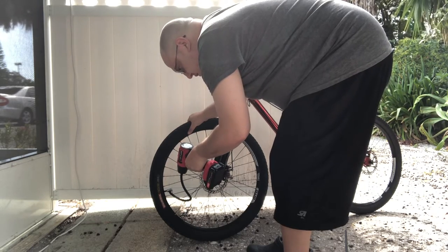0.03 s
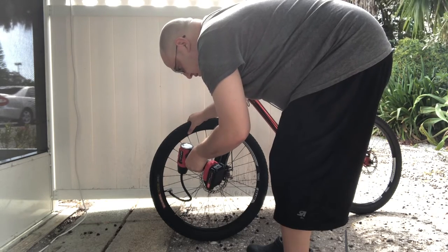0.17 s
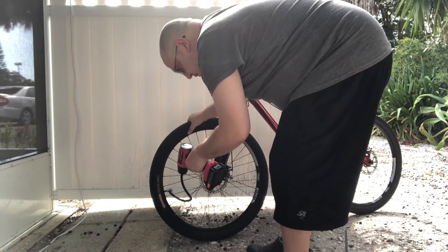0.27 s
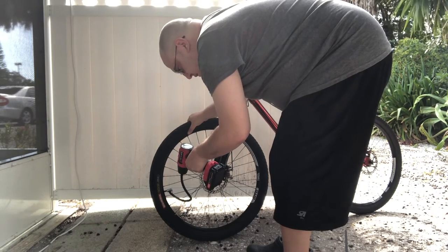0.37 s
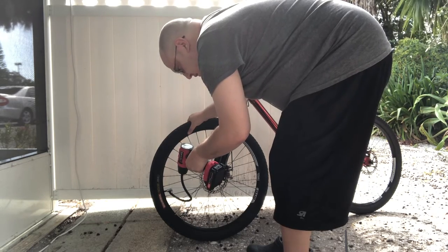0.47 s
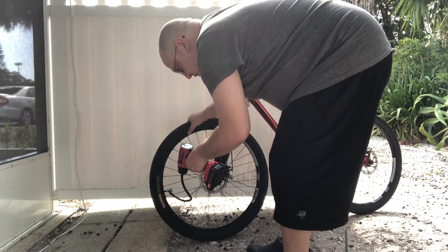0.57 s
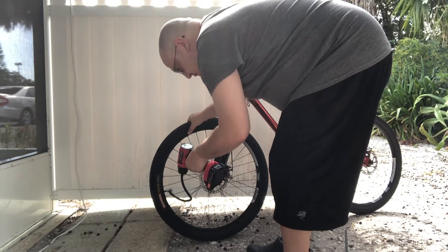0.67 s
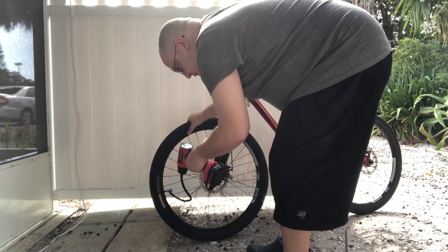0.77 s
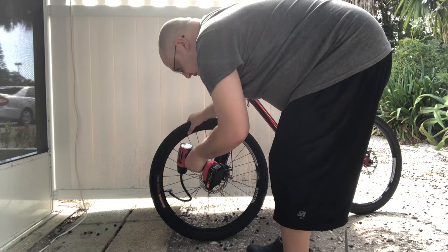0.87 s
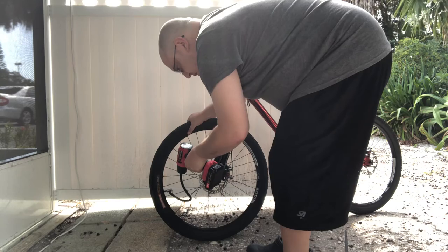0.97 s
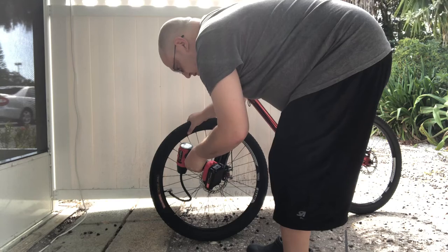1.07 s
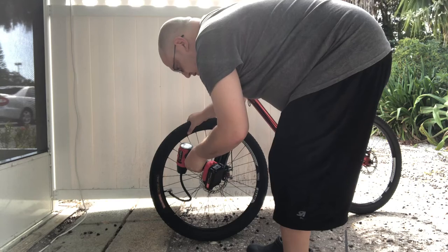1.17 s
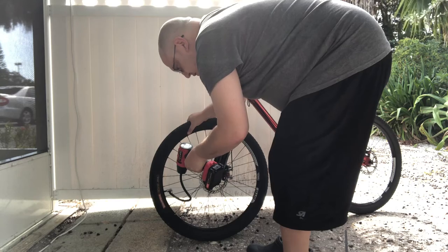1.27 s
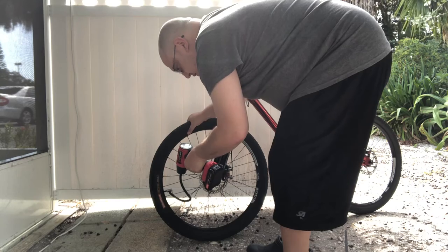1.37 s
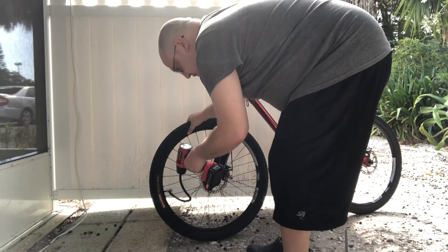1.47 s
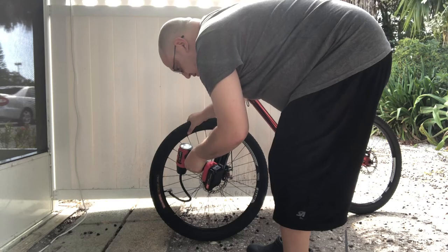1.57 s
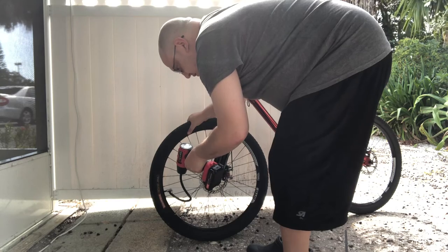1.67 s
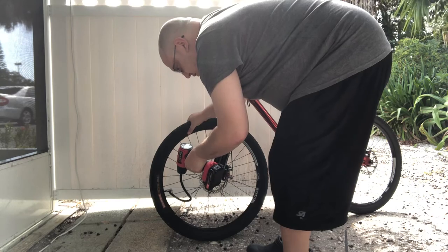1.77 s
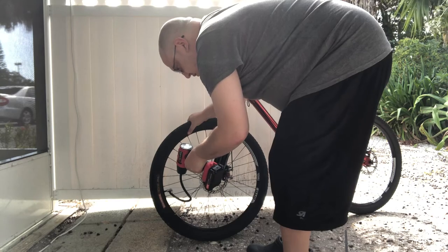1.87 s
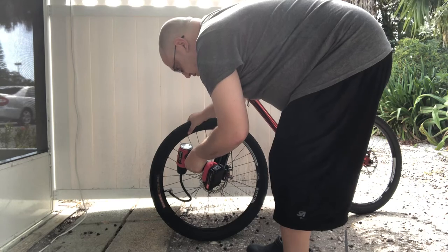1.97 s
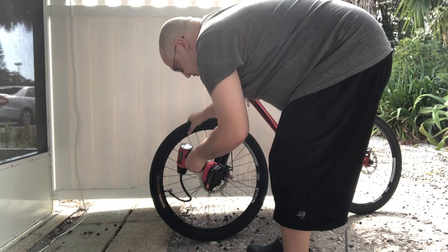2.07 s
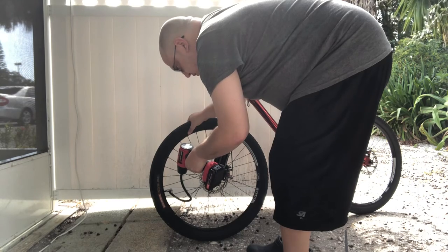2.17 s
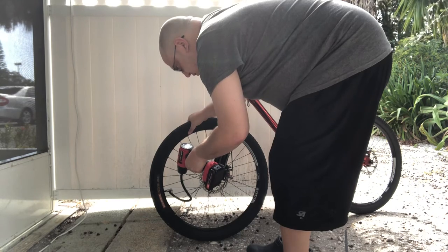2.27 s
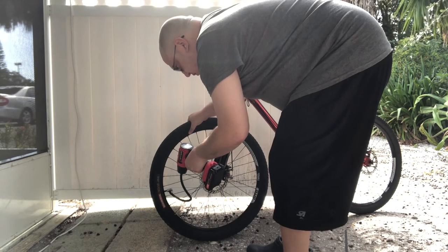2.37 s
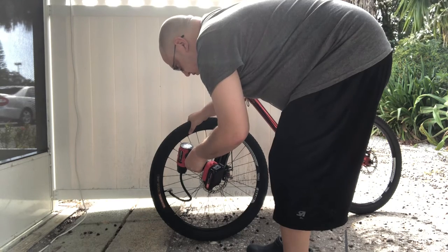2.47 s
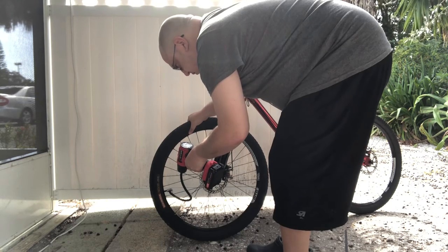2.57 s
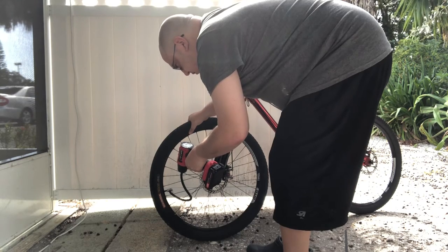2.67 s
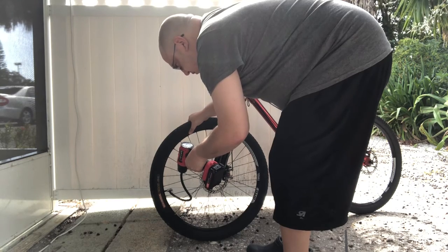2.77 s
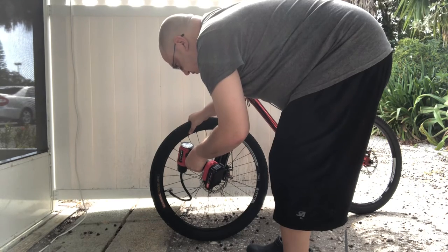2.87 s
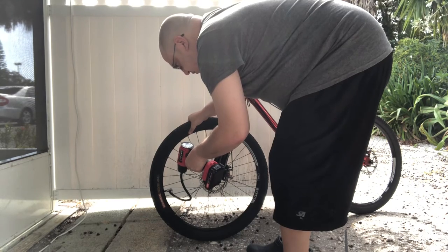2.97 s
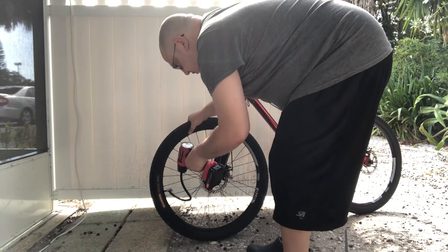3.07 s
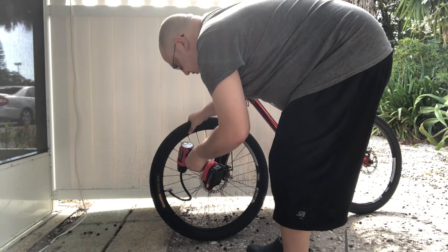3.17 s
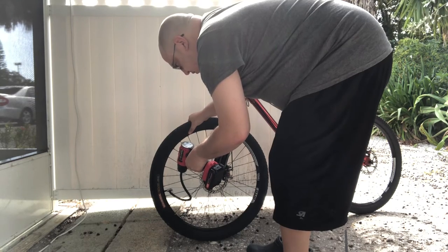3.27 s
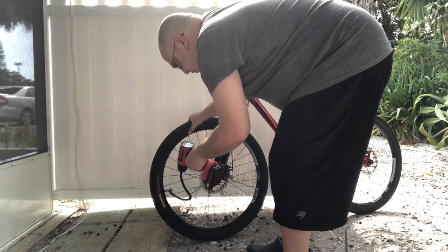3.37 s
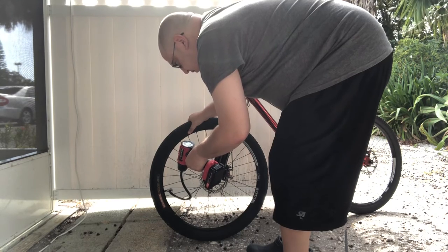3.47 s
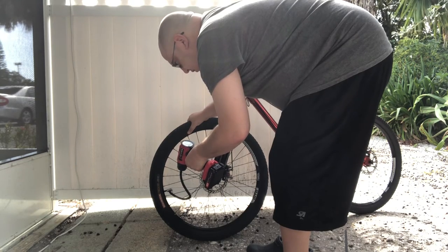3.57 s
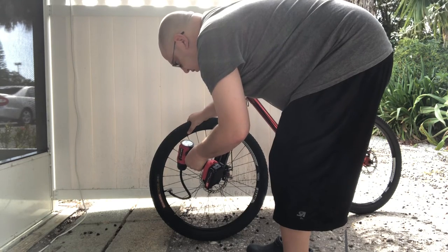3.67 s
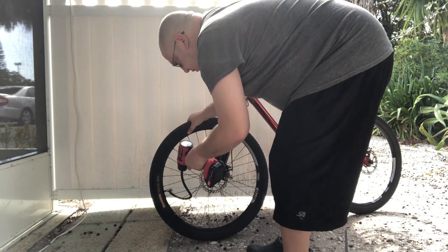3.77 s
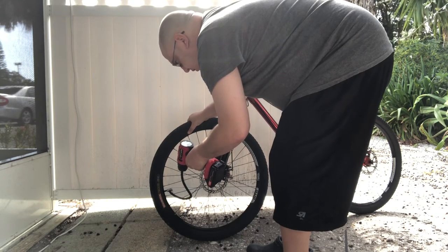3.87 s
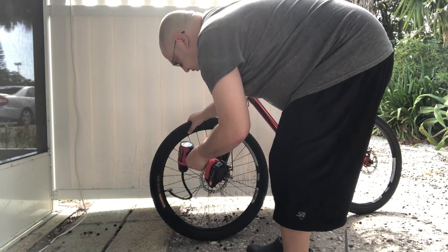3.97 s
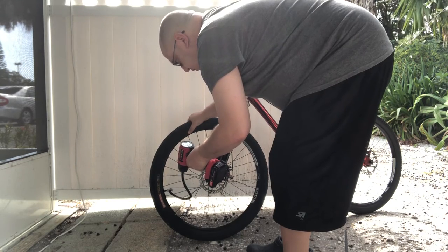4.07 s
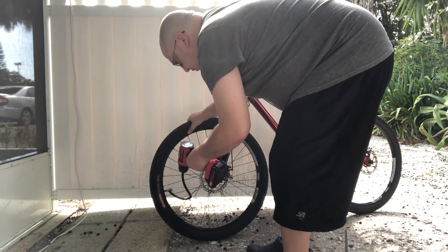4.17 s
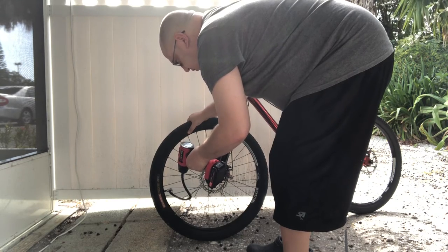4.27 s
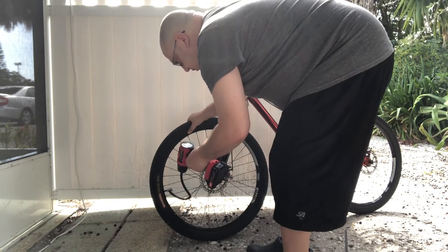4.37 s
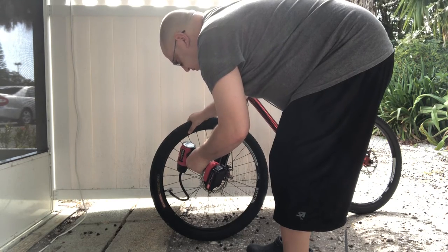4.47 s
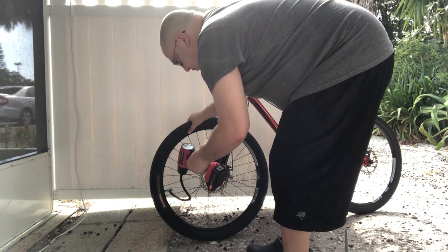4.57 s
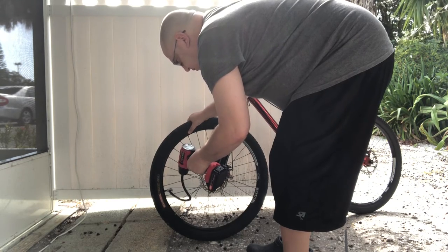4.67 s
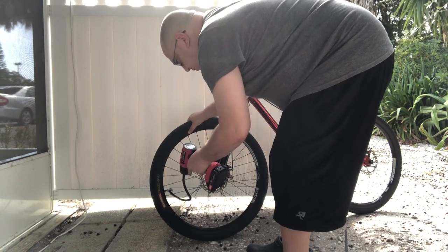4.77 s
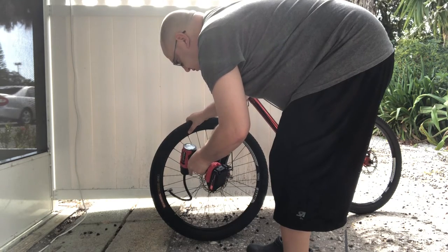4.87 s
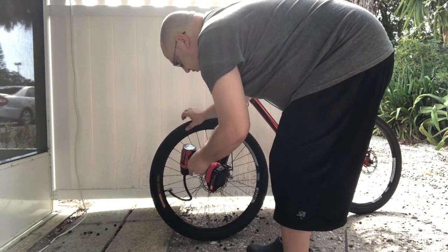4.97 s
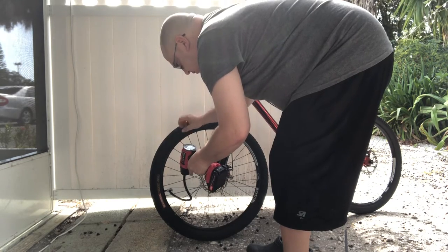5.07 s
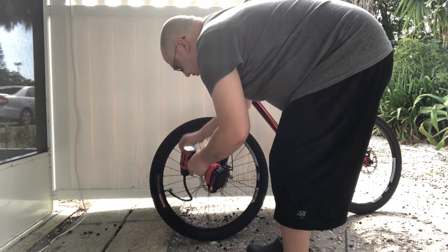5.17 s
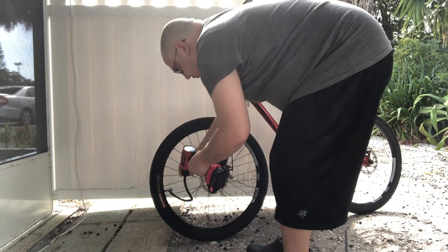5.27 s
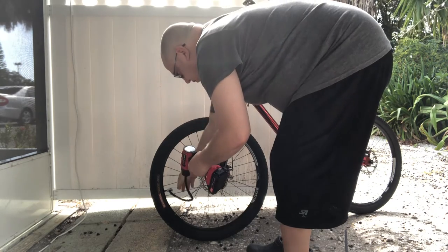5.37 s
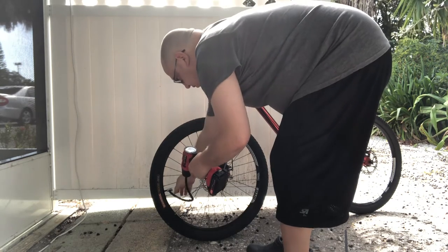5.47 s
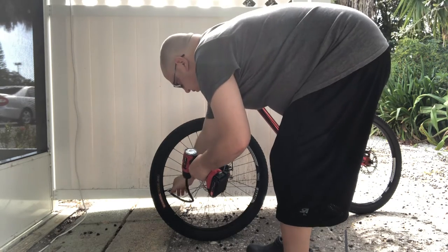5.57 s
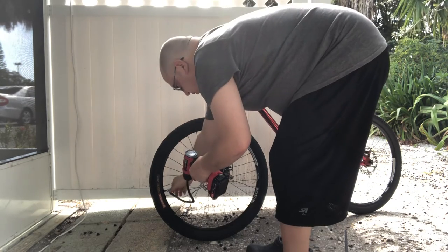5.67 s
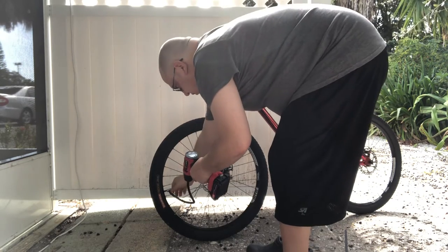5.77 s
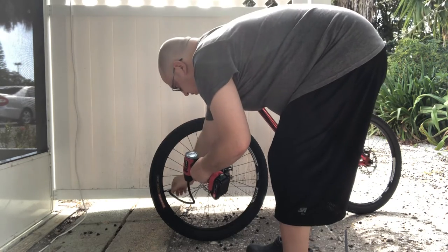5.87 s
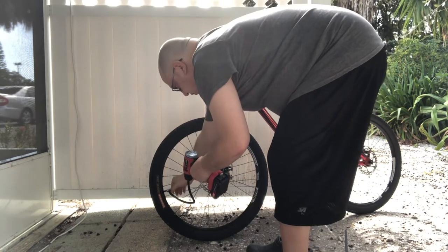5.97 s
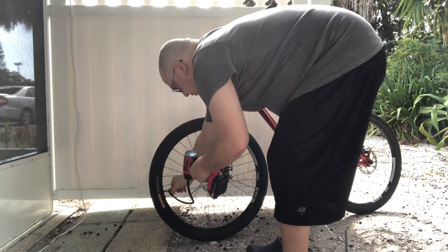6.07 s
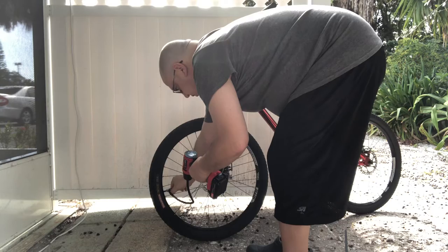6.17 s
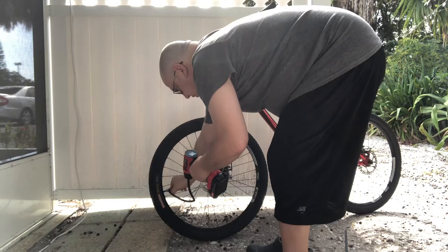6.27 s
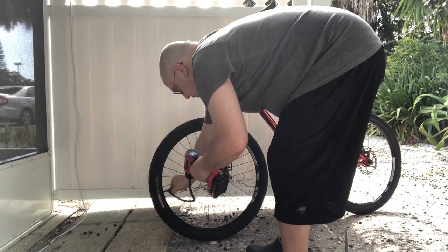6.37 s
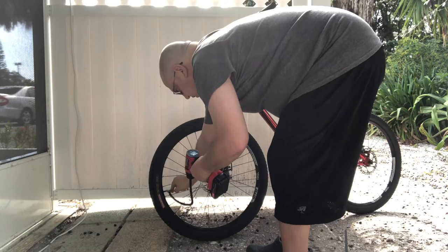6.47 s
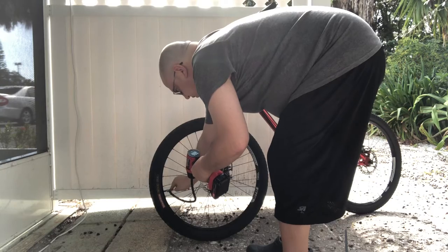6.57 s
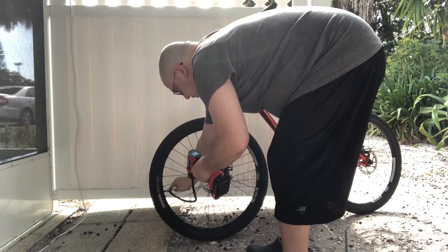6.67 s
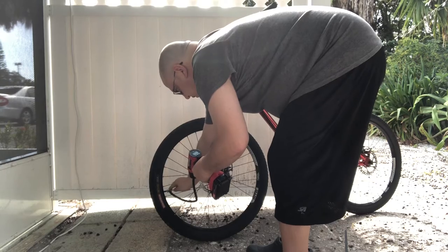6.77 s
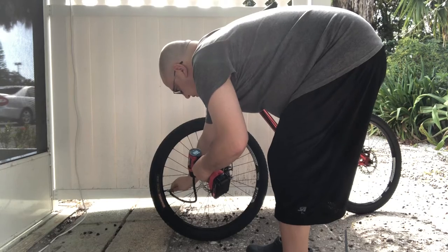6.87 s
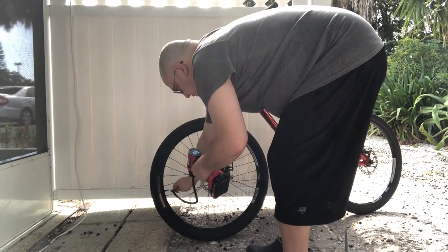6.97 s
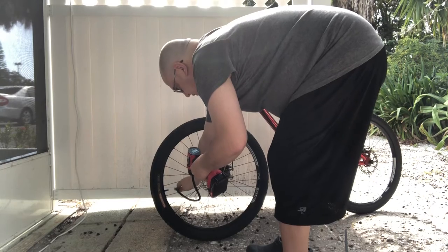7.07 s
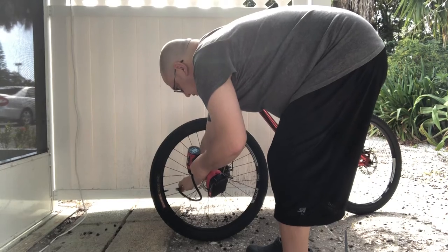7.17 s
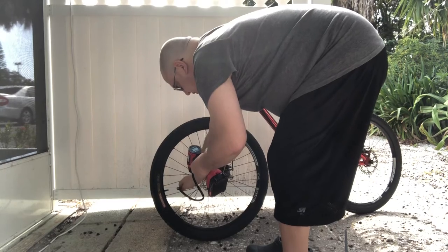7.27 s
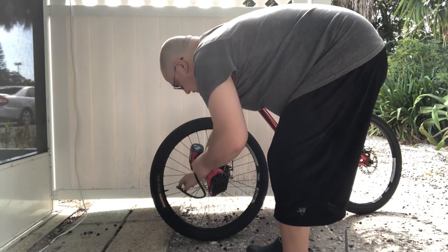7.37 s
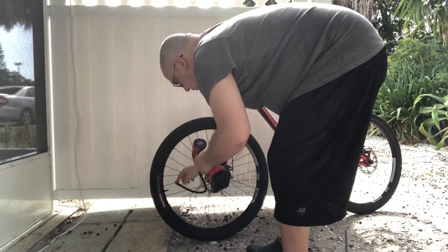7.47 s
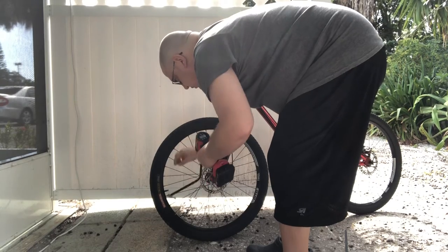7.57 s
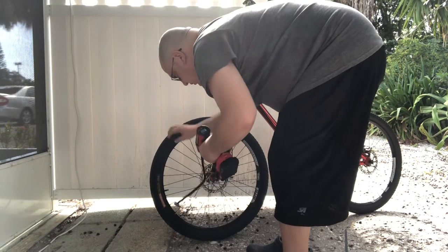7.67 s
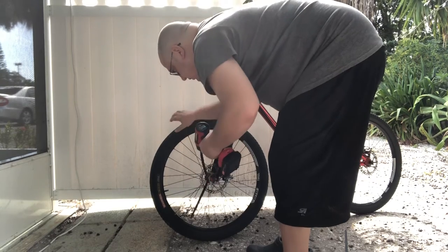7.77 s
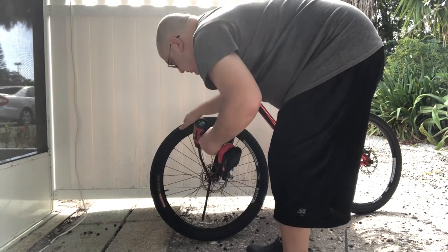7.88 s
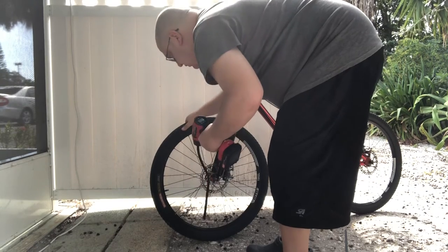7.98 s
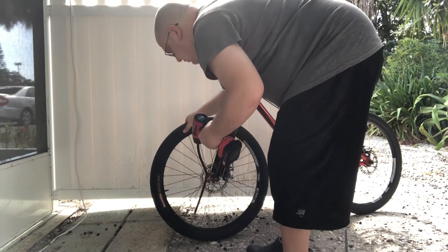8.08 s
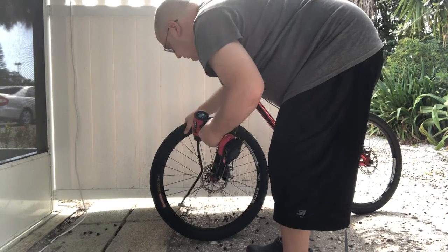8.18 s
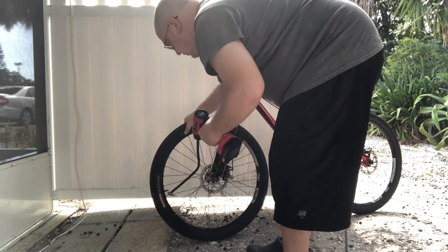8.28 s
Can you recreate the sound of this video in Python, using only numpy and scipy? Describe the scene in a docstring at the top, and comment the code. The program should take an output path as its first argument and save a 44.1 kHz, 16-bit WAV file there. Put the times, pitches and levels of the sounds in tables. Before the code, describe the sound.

From the very start a small cordless compressor is running at full speed, a dense rattling buzz at roughly 33 strokes a second, with gear clatter in the midrange, popping intake and a thin bright motor hiss. The pitch sags very slightly as the tyre fills, and around 3.2 seconds the tone shifts as pressure builds and the outlet tones change balance. At 4.4 seconds it is switched off, winding down within a quarter second to a soft final pop near 4.6. Quiet outdoor air remains, low distant traffic rumble under smooth faint hiss. Soft thuds and hand rubbing come around 5.3 to 6 seconds. At 6.43 a tiny crisp spit of air and very brief high whistle escape, then small chuck clicks at 7.0. A far engine drones faintly past, nearest near 6.9. Light rubbing returns at 8. The patio wall gives a short reflection.

```python
"""A cordless air compressor pumps up a bicycle tyre on a patio beside a wall, then is switched off and runs down.
Each crank turn repeats a rattle of gears, a pop of the intake valve, short outlet tones and seven motor ticks.
The hose is then unscrewed: filtered noise makes the spits of air and clicks, a gliding tone the short whistle.
Hands rub the hose amid a few soft thuds. Behind, traffic rumbles under a smooth hiss and one engine drones past."""
import sys
import numpy as np
from scipy import signal
from scipy.fft import rfft, irfft, next_fast_len
from scipy.io import wavfile
from scipy.ndimage import uniform_filter1d

SR = 44100
rng = np.random.default_rng(int(sys.argv[2]) if len(sys.argv) > 2 else 0)


def int16_out(signal):
    """Quantize to a 16-bit WAV file."""
    q = np.round(np.clip(np.atleast_2d(signal).T, -1, 1) * 32767)
    wavfile.write(sys.argv[1], SR, q.astype(np.int16))


N = 367774
T = np.arange(N) / SR  # time of each sample, in seconds
FFT_SIZE = next_fast_len(N + SR // 2)
FREQS = np.maximum(np.fft.rfftfreq(FFT_SIZE, 1 / SR), 1)
TOP_HZ = 15700  # highest pitch that the recorder keeps

# levels of the pump's parts at full speed
VALVE_DB, GEAR_DB, BRUSH_DB = -36, -34.5, -43.5
START_TURN = .229  # where in its turn the crank begins


def compressor(fade_power=3.1):
    """All parts follow the crank; their sound dies with its speed when the motor stops."""
    hz = crank_speed()
    turn = START_TURN + np.cumsum(hz) / SR
    crank_hz = np.median(hz[hz > 0])
    pace = hz / crank_hz  # speed against the usual one
    pops = valve(turn) * undb(VALVE_DB)
    outlet_tones = outlet(turn, crank_hz, back_pressure()) * pace ** 2
    rattle = gears(turn, crank_hz) * undb(GEAR_DB)
    motor = brushes(turn) * undb(BRUSH_DB) * pace ** 2
    return (pops + outlet_tones + rattle + motor) * pace ** fade_power


# turns a second at the start, and how many are lost to the growing load by switch-off
CRANK_HZ, SAG_HZ = 32.948, .366
# the switch is released; friction then stops the crank in COAST_S
OFF_S, COAST_S = 4.405, .25


def crank_speed():
    """Turns a second: the motor sags ever faster as the tyre fills, then coasts to a stop."""
    driven = CRANK_HZ - SAG_HZ * np.minimum(T / OFF_S, 1) ** 2
    return driven * np.clip(1 - (T - OFF_S) / COAST_S, 0, 1)


# the load on the outlet (0-1) climbs from low to high around LOADED_S, over a few LOADING_S
LOW_PRESSURE, HIGH_PRESSURE, LOADED_S, LOADING_S = .33, 0.95, 3.17, 0.22


def back_pressure():
    """Load on the outlet valve, 0-1: low at first, high once the tyre is firm."""
    firm = (1 + np.tanh((T - LOADED_S) / (2 * LOADING_S))) / 2
    return np.clip(LOW_PRESSURE + (HIGH_PRESSURE - LOW_PRESSURE) * firm, 0, 1)


# tone of the valve pop: (multiple of the crank speed, relative level [dB])
POP_HARMONICS = [(7, -9.5), (8, -25), (9, -44), (10, -6), (11, -10), (12, -9), (13, -13), (14, -13.5),
                 (15, -19.5), (16, -27), (17, -8), (18, -7), (19, -9), (20, -30.5), (21, -11.5), (22, -4),
                 (23, -5), (24, -21), (25, -13), (26, -17), (27, -3.5), (28, -3.5), (29, -0.5), (30, -4.5),
                 (31, -2.5), (32, -9.5), (33, -12.5), (34, -10.5)]
POP_TURN = .555  # where in the turn the valve pops


def valve(turn, smear=0.73, scatter_db=0.96, puff_db=-7, size=1024):
    """The intake valve pops once a turn, smeared by the housing; a puff of air rings the inlet."""
    angle = np.arange(size) / size
    wave = 0
    for k, db in POP_HARMONICS:
        # a random shift of each harmonic, largest in the bass, smears the pop
        shift = smear * (1 + (10 / k) ** 2) * rng.standard_normal()
        wave = wave + undb(db) * np.cos(2 * np.pi * k * (angle - POP_TURN) + shift)
    pop = np.interp(turn % 1, angle, unit(wave))
    flow = stroke(turn, at=POP_TURN, rise=0.37, fall=0.064, rest=0.33)
    puff = ring(noise() * flow, [(964, 82, 0.0), (715, 350, -8.5), (413, 73, -11.5)])
    return pop * undb(scatter_db * walk(33)) + undb(puff_db) * puff


# resonances of the gearbox and casing: (pitch [Hz], width [Hz], relative level [dB])
CASING_MODES = [(1156, 82, 1), (1249, 33, 2), (1318, 145, -1), (1435, 40, 2), (1590, 160, -4),
                (1610, 30, -2.5), (1800, 154, -1.5), (2120, 230, -6.5), (2460, 420, -4), (2620, 420, -10),
                (2880, 530, -6.5), (3250, 210, -8), (3456, 320, -3.5), (3974, 260, -6.5),
                (4550, 330, -13.5), (5110, 580, -11.5), (5870, 220, -24), (6950, 590, -18),
                (8210, 420, -16.5)]


def gears(turn, crank_hz, loose_db=-4, loose_tilt_db=2.5, scatter_db=0.65, grit_db=4.0):
    """Gear teeth strike under load: the same teeth in every turn, plus brighter chatter from their play."""
    def force(a):
        return stroke(a, at=0.209, rise=0.13, fall=0.32, rest=0.93)

    orders = np.arange(20, 200)  # multiples of the crank speed
    steady = repeating(turn, force, orders, resonances(CASING_MODES, orders * crank_hz), spread=0.1197)
    # the loose chatter gains loose_tilt_db with each octave
    bright = [(f, w, db + loose_tilt_db * np.log2(f / crank_hz)) for f, w, db in CASING_MODES]
    grit = noise() * undb(grit_db * walk(1100))
    chatter = ring(grit * (force(turn) + 0.43), bright)
    return steady * undb(scatter_db * walk(120)) + undb(loose_db) * chatter


def repeating(turn, force, orders, gains, spread, size=4096):
    """Chatter that is alike in every turn: it follows the force and holds the given harmonics."""
    angle = np.arange(size) / size
    teeth = rng.standard_normal(size) * force(angle) ** 2
    # each group of ten harmonics leaves the casing with its own lag, in turns
    lag = spread * np.repeat(rng.uniform(-1.0035, 1, len(orders)), 10)[:len(orders)]
    phase = np.angle(rfft(teeth)[orders]) - 2 * np.pi * np.cumsum(lag)
    spectrum = np.zeros(size // 2 + 1, complex)
    spectrum[orders] = gains * np.exp(1j * phase)
    return np.interp(turn % 1, angle, unit(irfft(spectrum)))


# tones of the outlet valve and air chamber: (pitch [Hz], peak level at load 0 [dB],
# peak level at load 1 [dB], place of the peak [turns], rise [turns], fall [turns])
OUTLET_TONES = [(560, -50, -31, .59, .07, .1), (1350, -44, -26.5, .14, .08, .1),
                (2445, -50, -25, .28, .1, .22), (2580, -48, -30, .19, .05, .07),
                (3520, -34, -44, .29, .1, .3), (3930, -48, -37, .15, .1, .2),
                (5500, -57, -44, .15, .1, .15)]


def outlet(turn, crank_hz, pressure, wobble=0.97, scatter_db=2.0):
    """Each stroke blows short tones from the outlet; the pressure sets how strongly each one speaks."""
    out = 0
    for hz, low_db, high_db, at, rise, fall in OUTLET_TONES:
        age = ((turn - at + .5) % 1 - .5) / crank_hz  # seconds from the peak
        tone = np.sin(2 * np.pi * hz * age + wobble * walk(150))
        level_db = low_db + (high_db - low_db) * pressure + scatter_db * walk(33)
        out = out + tone * stroke(turn, at, rise, fall, rest=0) * undb(level_db)
    return out


# ring of the motor's brushes: (pitch [Hz], width [Hz], relative level [dB])
BRUSH_MODES = [(5100, 3100, -1), (6770, 350, -1.5), (7590, 310, 0), (8000, 130, -12), (9270, 560, -4.5),
               (10370, 650, -1.5), (11470, 670, -1.5), (12860, 900, -2), (14300, 770, 3.5),
               (14000, 490, -1), (14800, 940, -10)]
GEAR_RATIO = 7  # motor turns for one crank turn


def brushes(turn, scatter_db=3.0):
    """The brushes hiss and tick once per motor turn, harder at both ends of the piston's travel."""
    ticks = stroke(turn * GEAR_RATIO, at=0.94, rise=0.033, fall=0.046, rest=0)
    ticks = ticks * undb(scatter_db * walk(230))
    one_end = stroke(turn, at=0.27, rise=0.036, fall=0.2, rest=1.07)
    other_end = 0.55 * stroke(turn, at=0.66, rise=0.037, fall=0.055, rest=0)
    return ring(noise() * (1.9 + ticks) * (one_end + other_end), BRUSH_MODES)


# bursts of air at the valve: (time [s], level [dB], centre [Hz], width [Hz], rise [s], decay [s])
AIR_SPITS = [(6.4285, -39.5, 9700, 2000, .001, .003), (6.4335, -37, 3600, 3300, .0006, 0.0079),
             (6.428, -38.5, 12500, 7100, 0.0039, .025), (6.442, -43, 12000, 900, .001, 0.01),
             (6.46, -48, 14600, 3000, .03, .033)]
# clicks of the chuck: (time [s], level [dB])
CHUCK_CLICKS = [(6.975, -52), (6.999, -40), (7.0045, -50)]
# resonances of the chuck: (pitch [Hz], width [Hz], relative level [dB])
CHUCK_MODES = [(680, 61, -3), (1560, 150, -3.5), (2250, 170, -1), (2500, 130, 4), (2730, 150, -4),
               (3340, 460, -9), (5200, 1800, -20), (11000, 5000, -36)]


def hose():
    """Trapped air spits and whistles out of the chuck, which then clicks off the valve."""
    air = 0
    for s, db, hz, width, rise, decay in AIR_SPITS:
        air = air + undb(db) * burst(T - s, rise, decay) * ring(noise(), [(hz, width, 0)])
    taps = sum(undb(db) * burst(T - s, rise=0.00044, decay=0.0072) for s, db in CHUCK_CLICKS)
    return air + whistle() + taps * ring(noise(), CHUCK_MODES)


# the whistle starts sharp, drops onto its pitch and creeps up again as it fades
WHISTLE_S, WHISTLE_DB, WHISTLE_RISE_S, WHISTLE_DECAY_S = 6.4415, -34, .004, .0045
WHISTLE_HZ, WHISTLE_SHARP_HZ, WHISTLE_SETTLE_S, WHISTLE_CREEP_HZ_PER_S = 10250, 1800, .002, 48000


def whistle():
    """The last air sings through the closing gap for a moment."""
    age = np.maximum(T - WHISTLE_S, 0)
    sharpness = WHISTLE_SHARP_HZ * np.exp(-age / WHISTLE_SETTLE_S)
    hz = WHISTLE_HZ + sharpness + WHISTLE_CREEP_HZ_PER_S * age
    tone = np.sin(2 * np.pi * np.cumsum(np.minimum(hz, TOP_HZ)) / SR)
    return undb(WHISTLE_DB) * burst(age, WHISTLE_RISE_S, WHISTLE_DECAY_S) * tone


# the hand rubs the hose: (middle [s], half length [s], level [dB])
HAND_RUBS = [(5.57, 0.38, -59.5), (8.0, .18, -62)]
GRIP_DB = -67  # faint rustle of the hands, always there
# soft low thuds, and the last valve pop as the crank stops (4.585 s):
# (time [s], level [dB], centre [Hz], width [Hz], decay [s])
THUDS_AND_LAST_POP = [(1.935, -41, 139, 45, 0.015), (4.585, -43, 1030, 380, 0.009),
                      (5.32, -47, 65, 14, .02), (5.6, -53, 1200, 150, .02)]


def handling(flutter_db=2.0):
    """Fingers rub the hose; short noise bursts make soft thuds and the last valve pop as the crank stops."""
    power = undb(GRIP_DB) ** 2 + sum((undb(db) * hump(s, half)) ** 2 for s, half, db in HAND_RUBS)
    skin = ring(noise(), [(1170, 730, -1.0), (2300, 240, -2), (2920, 100, 0.5), (4530, 2400, -10)])
    out = np.sqrt(power) * undb(flutter_db * walk(26)) * skin
    for s, db, hz, width, decay in THUDS_AND_LAST_POP:
        out = out + undb(db) * burst(T - s, 0.0043, decay) * ring(noise(), [(hz, width, 0)])
    return out


# tone of distant traffic and leaves: (pitch [Hz], relative level per Hz [dB])
OUTDOOR_TONE = [(25, -21), (45, -13), (68, 3.5), (120, -2), (200, -4.5), (290, -7.5), (420, -11.5),
                (700, -14), (1050, -13), (2000, -21.5), (3600, -24), (7700, -31), (8600, -36.5),
                (15500, -40)]
OUTDOORS_DB = -50.5  # rumble and hiss together
RUMBLE_DB = -2  # rumble against hiss outside the swell
# the rumble swells once: middle, half length, rise
SWELL_S, SWELL_HALF_S, SWELL_DB = 3.7, 1.7, 3.2
# the far engine: nearest moment, time in which it loses 3 dB, level when nearest
PASS_S, PASS_HALF_S, DRONE_DB = 6.85, 0.82, -54


def outdoors(waver_db=0.5):
    """Distant traffic whose rumble swells and wavers under a smooth hiss; one engine passes far off."""
    hz, db = np.transpose(OUTDOOR_TONE)
    gain = undb(np.interp(np.log(FREQS), np.log(hz), db))
    low = 1 / (1 + (FREQS / 170) ** 2)  # share of the power that goes to the rumble
    rumble_db = RUMBLE_DB + SWELL_DB * hump(SWELL_S, SWELL_HALF_S) + waver_db * walk(11)
    rumble = colour(noise(), gain * np.sqrt(low)) * undb(rumble_db)
    hiss = colour(noise(), gain * np.sqrt(1 - low))
    distance = np.hypot(1, (T - PASS_S) / PASS_HALF_S)  # 1 when nearest
    drone = undb(DRONE_DB) / distance * ring(noise(), [(164.3, 6.2, 4), (114, 11, 3.5), (276, 94, -9)])
    return undb(OUTDOORS_DB) * unit(rumble + hiss) + drone


def patio(x, wet_db, t60=0.34):
    """Wall, roof and paving add a short diffuse tail that loses 60 dB in t60 seconds."""
    t = T[:SR // 2]
    tail = rng.standard_normal(len(t)) * burst(t - .003, 0.0034, t60 / np.log(1000))
    return x + undb(wet_db) * signal.fftconvolve(x, tail / np.linalg.norm(tail))[:N]


def undb(db):
    """Decibels to gain."""
    return 10 ** (np.asarray(db) / 20)


def unit(x):
    """Scale to rms 1."""
    return x / np.sqrt(np.mean(x ** 2))


def noise():
    """White noise."""
    return rng.standard_normal(N)


def walk(rate):
    """Random wander around 0, mostly within 1: straight slopes between `rate` chance values a second."""
    k = int(SR / rate)
    steps = np.repeat(rng.standard_normal(N // k + 1), k)
    return 0.68 * uniform_filter1d(steps, k)[:N]


def resonances(modes, hz):
    """Gain at hz of a set of resonances with steep skirts."""
    power = 0
    for f, width, db in modes:
        detune = (hz - f * f / hz) / (2 * width)
        power = power + undb(2 * db) / (1 + detune ** 2 * 2) ** 2
    return np.sqrt(power)


def colour(x, gain):
    """Filter by a gain for each of FREQS."""
    return irfft(rfft(x, FFT_SIZE) * gain, FFT_SIZE)[:N]


def ring(x, modes):
    """Drive a set of resonances with x; rms 1."""
    grid = FREQS[::16]  # a coarse grid is enough and saves time
    return unit(colour(x, np.interp(FREQS, grid, resonances(modes, grid))))


def burst(age, rise, decay):
    """Envelope that rises in a straight line, then dies away."""
    return np.clip(age / rise, 0, 1) * np.exp(-np.maximum(age - rise, 0) / decay)


def hump(middle, half):
    """Envelope that swells to 1 and ebbs again."""
    return np.exp(-((T - middle) / half) ** 2)


def stroke(turn, at, rise, fall, rest):
    """Force over one turn: it swells to a peak at one angle and ebbs to a steady rest."""
    past = (turn - at + .5) % 1 - .5  # turns past the peak
    return rest + np.exp(-(past / np.where(past < 0, rise, fall)) ** 2)


def scene():
    """The pump, the hose and the hands, over the outdoor background."""
    pump = patio(compressor(), wet_db=-12)
    unscrewing = patio(hose(), wet_db=-4, t60=0.33)
    return (pump + unscrewing + handling() + outdoors())[None]


def record(dry):
    """The recorder cuts the top steeply."""
    return signal.sosfilt(signal.ellip(12, .2, 80, TOP_HZ, fs=SR, output="sos"), dry)


dry = scene()
out = record(dry)
int16_out(out)
```